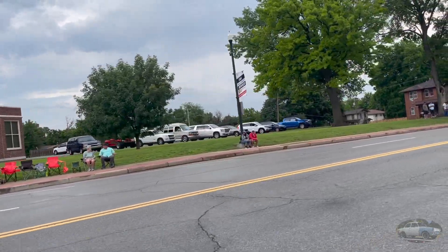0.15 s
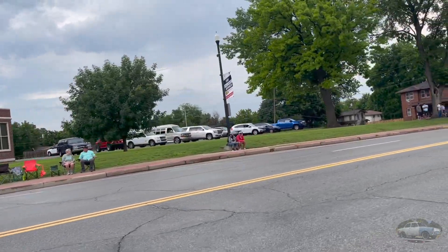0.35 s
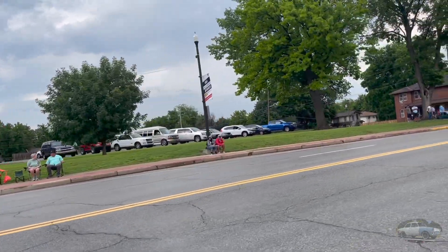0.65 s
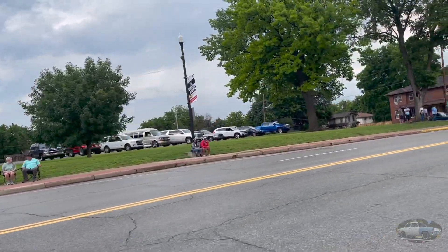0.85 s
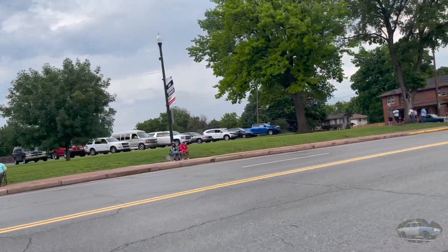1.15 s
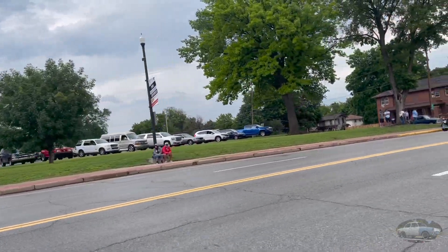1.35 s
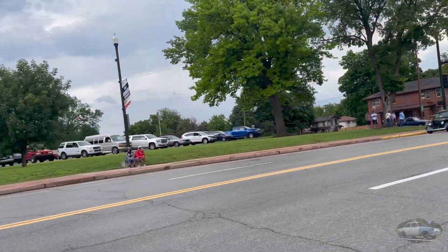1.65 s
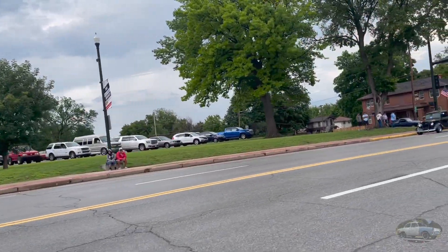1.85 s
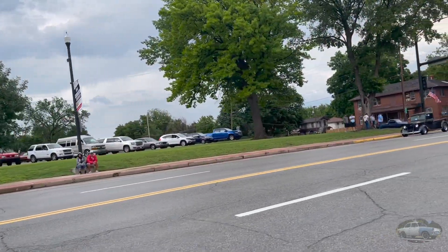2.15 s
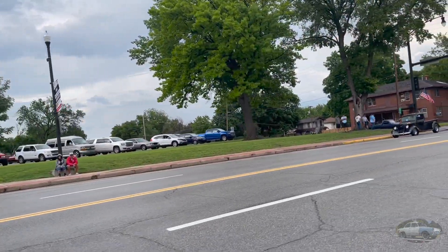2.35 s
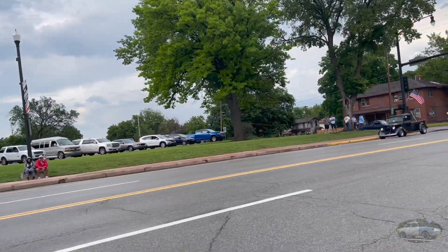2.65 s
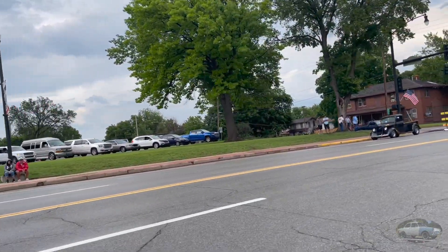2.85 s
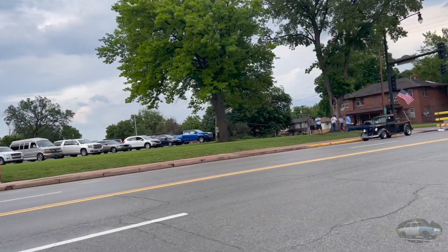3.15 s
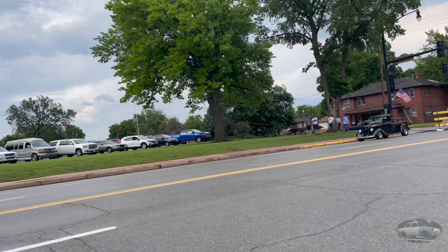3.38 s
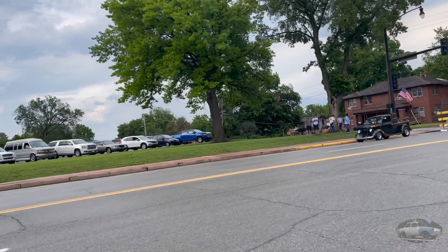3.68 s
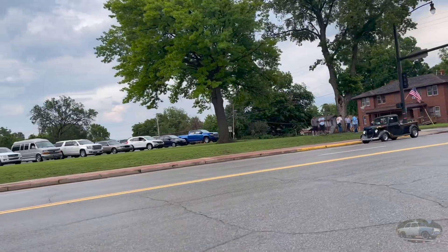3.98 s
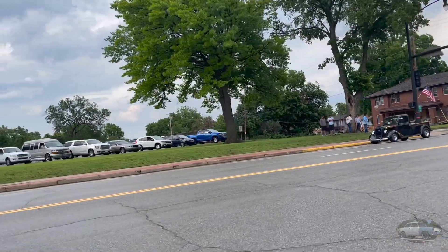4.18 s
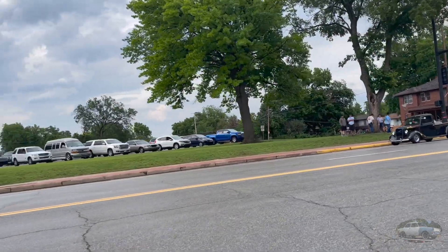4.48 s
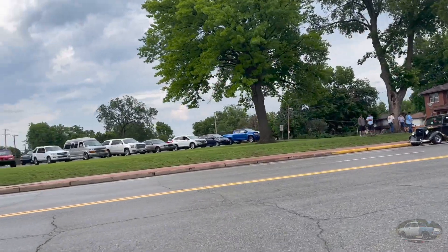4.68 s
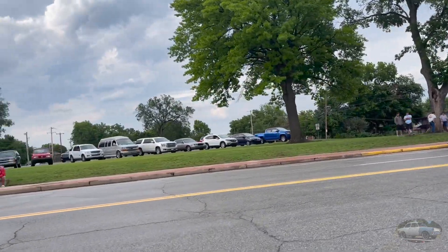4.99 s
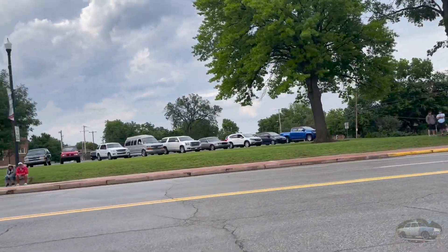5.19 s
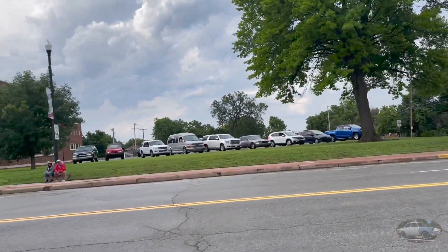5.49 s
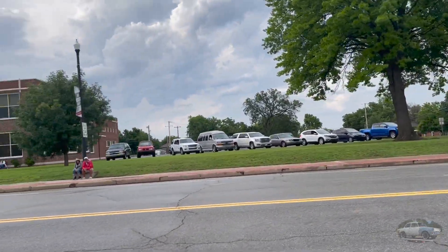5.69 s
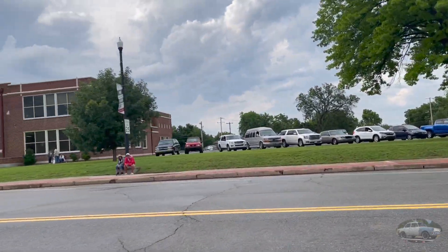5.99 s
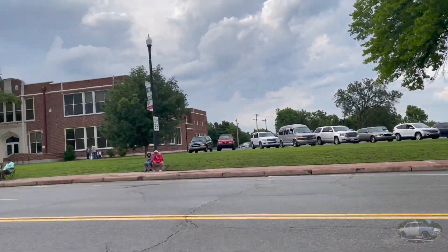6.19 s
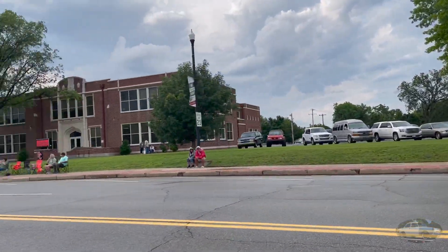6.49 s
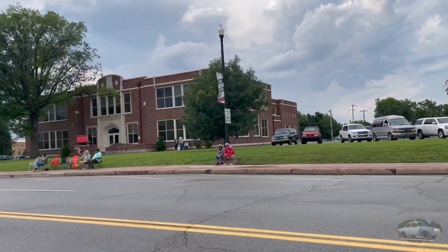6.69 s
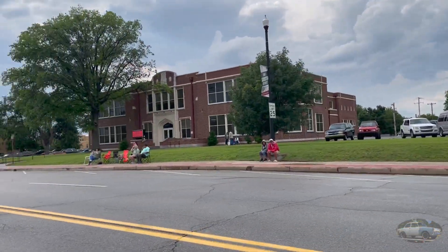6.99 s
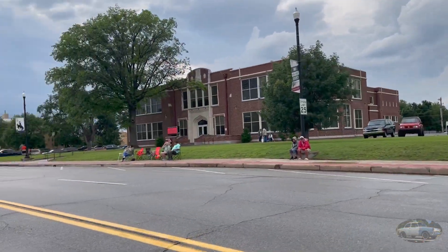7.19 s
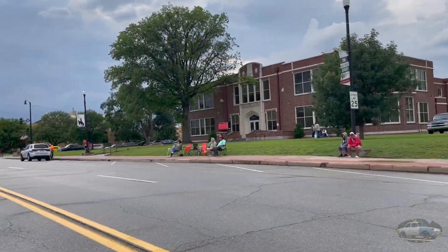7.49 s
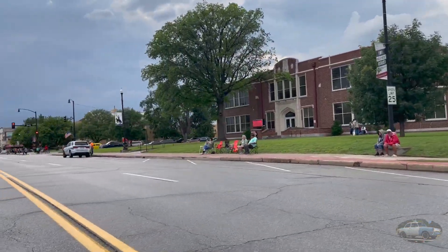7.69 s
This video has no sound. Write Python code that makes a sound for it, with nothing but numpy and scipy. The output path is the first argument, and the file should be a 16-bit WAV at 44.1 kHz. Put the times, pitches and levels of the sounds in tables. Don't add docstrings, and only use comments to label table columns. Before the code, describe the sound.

Deep engine drone and soft tyre hiss in a moving car, a passing car's hum, faint panel rattle, then heavy wind thumping the microphone.

```python
import sys
import numpy as np
from scipy import signal
from scipy.fft import rfft, irfft
from scipy.io import wavfile
from scipy.ndimage import uniform_filter1d

SR = 44100
rng = np.random.default_rng(int(sys.argv[2]) if len(sys.argv) > 2 else 0)


def generate_wav(signal):
    frames = np.transpose(np.atleast_2d(signal))
    scaled = np.clip(frames, -1, 1) * 32767
    pcm = np.round(scaled).astype(np.int16)
    wavfile.write(sys.argv[1], SR, pcm)


def linear_from_db(decibels):
    return 10 ** (np.asarray(decibels, float) / 20)


N = 345744

# (time [s], rate [turns/s])
CRANK_HZ = [(0, 17.2), (.3, 16.95), (1, 16.8), (2, 16.65), (3, 16.45), (3.7, 16.15), (4.1, 15.7),
            (4.5, 15.15), (5.2, 14.5), (5.8, 13.8), (6.6, 12.9), (7.1, 12.3), (7.84, 12.1)]
LOAD_CHANGES_S = [
    3.3,
    3.8,
    5.8,
    6.2,
]
# (multiple of crank rate, level [dB])
PULL_ORDERS_DB = [(0.5, -36), (1, -30), (1.5, -32), (2, -13), (2.5, -20), (3, -9), (3.5, -18), (4, 0),
                  (4.5, -8), (5, -6), (5.5, -18), (6, -5), (6.5, -19), (7, -8), (7.5, -22), (8, -13),
                  (8.5, -17), (9, -13), (9.5, -17), (10, -15), (10.5, -18), (11, -13), (11.5, -27),
                  (12, -17), (12.5, -29), (13, -21), (13.5, -26), (14, -24), (14.5, -29), (15, -22)]
# (multiple of crank rate, level [dB])
COAST_ORDERS_DB = [(0.5, -32), (1, -25), (1.5, -27), (2, -28), (2.5, -25), (3, -4), (3.5, -4), (4, 0),
                   (4.5, -10), (5, 1.5), (5.5, -37), (6, -7.5), (6.5, -9.5), (7, -38), (7.5, -30), (8, -27),
                   (8.5, -6), (9, -21), (9.5, -40), (10, -7.5), (10.5, -5), (11, -11), (11.5, -4.5),
                   (12, -24), (12.5, -11), (13, -21), (13.5, -20), (14, -46), (14.5, -12), (15, -28)]
# (multiple of crank rate, level [dB])
IDLE_ORDERS_DB = [(0.5, -32), (1, -25), (1.5, -29), (2, -28), (2.5, -22), (3, -32), (3.5, 5), (4, 9.5),
                  (4.5, -21), (5, 5), (5.5, 1), (6, 7.5), (6.5, 2), (7, 12), (7.5, 4), (8, 5.5), (8.5, -28),
                  (9, -5), (9.5, 0), (10, 4), (10.5, 2), (11, -19), (11.5, 8), (12, -12.5), (12.5, -26),
                  (13, -2.5), (13.5, -7), (14, -2.5), (14.5, -5.5), (15, -14)]
CYLINDERS_DB = [0, -13, -4, -15, -1, -12, -5, -14]
# (centre [Hz], width [Hz], level [dB])
PIPE_MODES = [(350, 60, -53), (520, 70, -55), (688, 38, -48.5), (1030, 120, -53.5)]
# (multiple of crank rate, level [dB])
WHINE_DB = [(37, -66), (39, -63), (42, -57.5)]
# (time [s], hum [Hz], level [dB])
ONCOMING = [
    (3.6, 171.7, -55),
    (4.0, 168, -38),
    (4.4, 164.4, -30.5),
    (4.7, 168.9, -40),
    (5.2, 177.1, -42.5),
    (5.8, 191.9, -33),
    (6.1, 198, -47),
]
# (centre [Hz], width [Hz], level [dB])
PANEL_MODES = [(2740, 70, 8), (2920, 140, 1), (3340, 140, 0), (3900, 100, -10), (4340, 130, -3)]
# (time [s], level [dB])
PANEL_DB = [(4.1, -83), (4.35, -63.5), (4.75, -58), (5.1, -71), (5.4, -76), (5.7, -85)]
# (frequency [Hz], density [dB/Hz])
RUMBLE_SPECTRUM = [(15, -41), (35, -29), (75, 4.5), (110, -3.5), (175, -5), (215, -19), (400, -39.5),
                   (800, -79)]
# (frequency [Hz], density [dB/Hz])
TYRE_SPECTRUM = [(120, -10), (230, -2.5), (300, -8), (620, -13.5), (850, -16.5), (1300, -22.5),
                 (1900, -26.5), (2800, -37), (4000, -40.5), (7200, -42), (9000, -43), (10800, -36.5),
                 (11500, -46.5), (11750, -80)]
# (frequency [Hz], density [dB/Hz])
AIR_SPECTRUM = [(700, 15.5), (1100, 3), (1600, 0.5), (2200, 2), (3800, 0), (4300, -4.5), (5700, -5.5),
                (6450, -15.5), (7400, -19.5), (8500, -6.5), (10300, -12), (11300, -21), (11800, -21),
                (12300, -40)]
# (frequency [Hz], left lead [rad], left-right [dB], road likeness [0-1], air likeness [0-1])
PORTS = [(0, 0, -1.4, .96, .96), (120, .1, -1.4, .82, .9), (250, .4, -.5, .75, .85),
         (500, 1.2, 1.5, .3, .65), (750, 2.3, 2.5, .5, .6), (1250, 3.1, 0, .2, .5), (2150, 6.2, 0, .4, .75),
         (3300, 7.7, 3, .65, .8), (4400, 6.9, 2, .4, .45), (5500, 7.7, 0, .2, .45),
         (6300, 6.3, .5, .55, .99), (7000, 6.3, .5, .4, .98), (7700, 6.9, 1.5, .6, .8),
         (8350, 6.32, 0, .995, .995), (8850, 6.2, 0, .995, .995), (9400, 4.5, 0, .75, .78),
         (10000, 3.22, 0, .995, .995), (10450, 3.06, 0, .995, .995), (11100, 1.6, 0, .65, .55),
         (11500, .2, 0, .97, .97)]
# (time [s], level [dB], dullness [dB])
WINDOW_DB = [(0, -67, 1.5), (4.15, -66, 0), (4.7, -60, 3), (5.15, -60.5, -0.5), (5.4, -57.5, 0.5),
             (6.55, -55.5, -1.5), (6.9, -53.5, 0.5), (7.45, -52.5, 0), (7.84, -51.5, 3.5)]
# (time [s], bright rise [dB], dull rise [dB], length [s])
PUFFS = [(0.953, 11, -1, .015), (2.99, 4, 1, .03), (3.896, 10, 10, .015), (4.74, -3, 2, .04),
         (5.268, 2, 0, .04), (6.647, 9.5, 1, 0.018), (6.792, 7, 3.5, .025), (6.868, 4, 2.5, 0.018),
         (6.997, 3, 2, 0.028), (7.161, 9, 6.5, 0.007), (7.217, 3, 4, 0.033), (7.39, 4.5, 4.5, 0.045),
         (7.718, 3.5, 1.5, 0.039)]
EDGE_HZ = [1580, 2120, 2350, 2600, 2900, 3250, 3550, 3800]
# (time [s], level [dB])
WIND_DB = [(4.2, -68), (4.82, -61), (5.4, -50.5), (5.89, -30), (6.2, -28.5), (6.65, -36.5), (7.32, -46),
           (7.5, -46), (7.79, -26.5)]
# (time [s], peak [dB], snap [dB])
SLAPS = [(5.359, -30, -21), (4.9, -17.5, -13), (5.144, -27, -18), (5.426, -37, -26), (5.646, -23, -13),
         (5.726, -21, -23), (5.811, -20.5, -18), (5.857, -15, -23), (5.924, -15, -34), (5.947, -17.5, -18),
         (6.002, -20, -25), (6.078, -13, -25), (6.118, -16.5, -20), (6.202, -17, -19), (6.381, -23, -21),
         (6.4, -19.5, -24), (6.418, -13, -23), (6.434, -16, -21), (6.471, -28, -8), (6.498, -12.5, -8.5),
         (6.545, -21.5, -12), (6.6, -15.5, -19), (6.785, -23.5, -27), (6.886, -27, -5), (6.999, -21, -3.5),
         (7.079, -30, -18), (7.387, -25.5, -19), (7.533, -16, -6), (7.771, -21, -8), (7.781, -15.5, -15)]
# (shuts [s], reopens [s], depth [dB])
DUCKS = [
    (6.668, 7.292, 7.5),
    (7.787, 8.2, 11.5),
]

ENGINE_DB, RUMBLE_DB, TYRES_DB = -24.5, -28.5, -38.74
LOAD_WANDER_DB = 0.5
BOOM_HZ, BOOM_WIDTH_HZ, BOOM_DB = 88.6, 5.6, 14.5
AIR_FLOOR_DB = -61
PORT_RING_HZ, PORT_RING_WIDTH_HZ, PORT_RING_DB = 6670, 940, -3
EDGE_WIDTH_HZ = 150
GALE_FROM_DB, GALE_SPAN_DB = -41.5, 5.5
TURN_PAN_DB = 0.66
SLAP_S, SLAP_PAN_DB, SLAP_PAN_SPREAD_DB = 0.013, 1.5, -1.5
SWEEP_FROM_HZ, SWEEP_TO_HZ, SWEEP_S, SWEEP_DB = 430, 90, .008, -2
SHUT_S, REOPEN_S, STAYS_SHUT, TYRES_DUCK_SHARE = 0.019, 0.09, .2, .15
START_S = .004
STEP = 16
SIDES = np.array([[.5], [-.5]])


def rms_one(x):
    return x / np.sqrt(np.mean(x ** 2) + 1e-20)


def in_time(rows):
    s, *columns = np.transpose(rows)
    return [np.interp(np.arange(N) / SR, s, c) for c in columns]


def drift(rate_hz, step=1):
    r = np.exp(-80 * np.pi * rate_hz / SR)
    slow = signal.lfilter([1], [1, -2 * r, r * r], rng.standard_normal(N // 40 + 2002))[2000:]
    slow = rms_one(slow - slow.mean())
    return np.interp(np.arange(0, N, step) / 40, np.arange(len(slow)), slow)


def band(x, low_hz, high_hz, order=3):
    return signal.sosfilt(signal.butter(order, [low_hz, high_hz], "band", fs=SR, output="sos"), x)


def resonance(x, hz, width_hz):
    r = np.exp(-np.pi * width_hz / SR)
    top = np.array([1, 0, -1]) * (1 - r * r) / 2
    bottom = [1, -2 * r * np.cos(2 * np.pi * hz / SR), r * r]
    return signal.lfilter(top, bottom, signal.lfilter(top, bottom, x))


def ports(shared, own, spectrum, alike_column):
    hz = np.fft.rfftfreq(N, 1 / SR) + 1e-3
    at_hz, level_db = np.transpose(spectrum)
    level_db = np.interp(np.log(hz), np.log(at_hz), level_db)
    at_hz, *columns = np.transpose(PORTS)
    lead_rad, pan_db, alike = [np.interp(hz, at_hz, columns[k]) for k in (0, 1, alike_column)]
    common = np.sqrt(alike) * np.exp(1j * SIDES * lead_rad) * rfft(shared)
    mix = common + np.sqrt(1 - alike) * rfft(own)
    return rms_one(irfft(mix * linear_from_db(level_db + SIDES * pan_db), N))


def patchy(together_db, own_db, rate_hz):
    white = rfft(rng.standard_normal((3, N)))
    together = drift(rate_hz)
    octave = np.clip(np.log2(np.fft.rfftfreq(N, 1 / SR) / 200 + 1e-6), 0, 6)
    noise = 0
    for k in range(7):
        part = irfft(white * np.clip(1 - np.abs(octave - k), 0, 1), N)
        noise = noise + part * linear_from_db(together_db * together + own_db * drift(rate_hz))
    return noise[0], noise[1:]


def wind_filter_db():
    t, cut_db = np.arange(N) / SR, 0
    for shut_s, reopen_s, depth_db in DUCKS:
        closing = np.clip((t - shut_s) / SHUT_S, 0, 1)
        opening = np.clip(1 - (t - reopen_s) / REOPEN_S, STAYS_SHUT, 1)
        cut_db = cut_db - depth_db * closing * opening
    return cut_db


def air_db():
    t, puffs_db = np.arange(0, N, STEP) / SR, 0
    for s, bright_db, dull_db, length_s in PUFFS:
        puffs_db = puffs_db + np.outer([bright_db, dull_db], np.exp(-((t - s) / length_s) ** 2))
    window_db, dullness_db = in_time(WINDOW_DB)
    bright_db, dull_db = window_db + np.repeat(puffs_db, STEP, axis=1)[:, :N]
    dull_power = linear_from_db(2 * AIR_FLOOR_DB) + linear_from_db(2 * (dull_db + dullness_db - 1.86))
    return 10 * np.log10(dull_power), bright_db


def oncoming_car():
    hz, level_db = in_time(ONCOMING)
    phase = 2 * np.pi * np.cumsum(hz) / SR + 0.85 * drift(10.8)
    return linear_from_db(level_db + 3 + 2.1 * drift(4.6)) * np.sin(phase)


def loose_panel():
    white, out = rng.standard_normal(N), 0
    for hz, width_hz, db in PANEL_MODES:
        out = out + rms_one(resonance(white, hz, width_hz)) * linear_from_db(db + 3.2 * drift(6.0))
    return linear_from_db(in_time(PANEL_DB)[0]) * rms_one(out)


def edge_whistle():
    white, out = rng.standard_normal(N), 0
    for hz in EDGE_HZ:
        whistle = resonance(white, hz, EDGE_WIDTH_HZ)
        out = out + whistle * linear_from_db(6.6 * drift(9.5)) * 3000 / (hz + 4000)
    return linear_from_db(1.7 * air_db()[0] + 33) * rms_one(out)


def window_air():
    hiss = ports(*patchy(together_db=1.1, own_db=.6, rate_hz=14.0), AIR_SPECTRUM, alike_column=3)
    dull_db, bright_db = air_db()
    dull = linear_from_db(dull_db + 3) * rms_one(band(hiss, 900, 7400))
    bright = linear_from_db(bright_db - 2.0) * rms_one(band(hiss, 7400, 14000))
    ring = rms_one(resonance(hiss, PORT_RING_HZ, PORT_RING_WIDTH_HZ))
    return linear_from_db(PORT_RING_DB + 1.803 * dull_db + 39.5) * ring + dull + bright


def wind_flutter():
    shared, *own = rng.standard_normal((3, N))
    flutter = band((shared + .4 * np.array(own)) * linear_from_db(4.5 * drift(25)), 120, 400)
    return linear_from_db(in_time(WIND_DB)[0] - 6.0) * rms_one(flutter)


def gust_slaps():
    out, t = np.zeros((2, N)), np.arange(4096) / SR
    for s, peak_db, snap_db in SLAPS:
        shared, *own = rng.standard_normal((3, len(t)))
        pan_db = SLAP_PAN_DB + SLAP_PAN_SPREAD_DB * shared[0]
        gust = (1 - np.exp(-t / .0015)) * (shared + .35 * np.array(own))
        thud = band(gust * np.exp(-(t / SLAP_S) ** 2), 128, 459)
        snap = band(gust * np.exp(-(t / .003) ** 2), 600, 1280)
        pitch_hz = SWEEP_TO_HZ + SWEEP_FROM_HZ * linear_from_db(1.15 * shared[1]) * np.exp(-t / SWEEP_S)
        sweep = np.sin(2 * np.pi * np.cumsum(pitch_hz) / SR + shared[2])
        sweep = sweep * np.minimum(t / .004, 1) * np.exp(-(t / (1.2 * SLAP_S)) ** 2)
        burst = linear_from_db(SWEEP_DB + 0.24 * snap_db) * sweep + 0.98 * thud / np.abs(thud).max()
        burst = burst + linear_from_db(snap_db - 6.0) * snap / np.abs(snap).max()
        burst = burst * linear_from_db(peak_db + 0.5 + pan_db * SIDES)
        at = round((s - .003) * SR)
        out[:, at:at + len(t)] += burst[:, :N - at]
    return out


def tyre_hiss():
    return ports(*patchy(together_db=.5, own_db=-1.44, rate_hz=3.3), TYRE_SPECTRUM, alike_column=2)


def road_rumble():
    white = rng.standard_normal((3, N))
    return ports(white[0], white[1:], RUMBLE_SPECTRUM, alike_column=2)


def gear_whine(crank_hz):
    turns, out = np.cumsum(crank_hz) / SR, 0
    load_db = np.interp(np.arange(N) / SR, LOAD_CHANGES_S[:2], [0, -9])
    for multiple, db in WHINE_DB:
        tone = np.sin(2 * np.pi * multiple * turns + .8 * drift(3.0))
        out = out + linear_from_db(db + 3 + load_db + 1.5 * drift(2.5)) * tone
    return out


def exhaust_pipe(crank_hz):
    firings = 4 * np.cumsum(crank_hz) / SR
    which, within = firings.astype(int), firings % 1
    uneven_db = .8 * rng.standard_normal(N // 100)[which]
    strength = linear_from_db(np.array(CYLINDERS_DB)[which % 8] + uneven_db)
    kicks = rms_one(strength * np.diff(which, prepend=0))
    gas = rms_one(strength ** .3 * np.exp(-.8 * within) * rng.standard_normal(N))
    flow = .8 * kicks + .6 * gas
    return sum(linear_from_db(db) * rms_one(resonance(flow, hz, 1.5 * width_hz)) for hz, width_hz, db in PIPE_MODES)


def engine(crank_hz):
    turns = (np.cumsum(crank_hz) / SR)[::STEP]
    t, out = np.arange(0, N, STEP) / SR, 0
    coasting = np.interp(t, LOAD_CHANGES_S, [0, 1, 1, 0])
    orders = zip(PULL_ORDERS_DB, COAST_ORDERS_DB, IDLE_ORDERS_DB)
    for (multiple, pull_db), (_, coast_db), (_, idle_db) in orders:
        level_db = np.interp(t, LOAD_CHANGES_S, [pull_db, coast_db, coast_db, idle_db])
        detuning = (multiple * crank_hz[::STEP] - BOOM_HZ) / BOOM_WIDTH_HZ
        level_db = level_db + BOOM_DB * coasting / (1 + detuning ** 2)
        phase = 2 * np.pi * (multiple * turns + rng.random()) + .12 * drift(1.2, STEP)
        phase = phase + rng.normal(.006 * multiple, .025 * multiple) * 2 * SIDES
        half = multiple % 1 > 0
        level_db = level_db - 4 * half + (.8 + 2 * half) * drift(1.5, STEP)
        out = out + linear_from_db(level_db) * np.sin(phase)
    out = out / np.sqrt(uniform_filter1d(np.mean(out ** 2, axis=0), SR // 2 // STEP))
    return signal.resample_poly(out, STEP, 1, axis=1)[:, :N]


def scene():
    crank_hz, = in_time(CRANK_HZ)
    duck_db, wander_db = wind_filter_db(), LOAD_WANDER_DB * drift(4.6)
    gale = np.clip((in_time(WIND_DB)[0] - GALE_FROM_DB) / GALE_SPAN_DB, 0, 1)
    turn_db = TURN_PAN_DB * np.maximum.accumulate(gale) * 2 * SIDES
    rustle = edge_whistle() + loose_panel()
    rustle = np.array([1.2 * rustle, .8 * np.roll(rustle, 17)])
    tyres = linear_from_db(TYRES_DB + TYRES_DUCK_SHARE * duck_db) * tyre_hiss()
    rumble = linear_from_db(RUMBLE_DB + duck_db - wander_db + 5.15 * gale + turn_db) * road_rumble()
    pipe = exhaust_pipe(crank_hz) + gear_whine(crank_hz)
    pipe = np.array([1.15 * pipe, 1.04 * np.roll(pipe, 18)])
    boom_db = ENGINE_DB + duck_db + wander_db - 1.6 * gale + turn_db - 1.4 * SIDES
    boom = linear_from_db(boom_db) * engine(crank_hz)
    wind = wind_flutter() + gust_slaps()
    return oncoming_car() + rustle + window_air() + wind + tyres + rumble + pipe + boom


def band_limit(x):
    return signal.sosfilt(signal.butter(12, 12250, fs=SR, output="sos"), x)


def record(dry):
    dry = dry * np.interp(np.arange(N) / SR, [0, START_S], [.3, 1])
    limited = 0.3 * np.tanh(dry / 0.3)
    return band_limit(limited)


dry = scene()
out = record(dry)
generate_wav(out)
```